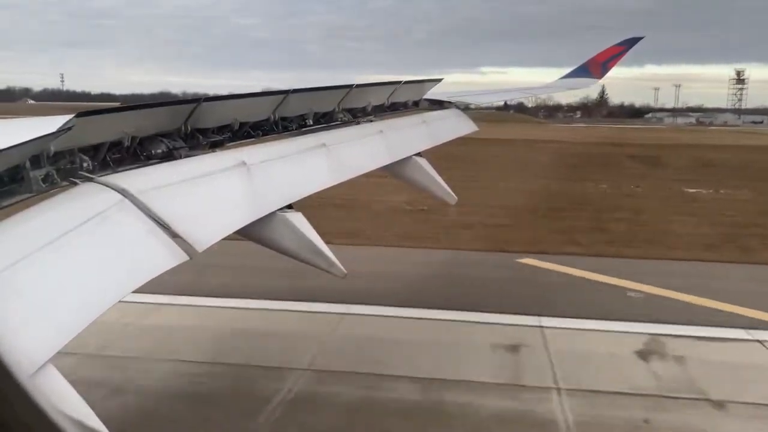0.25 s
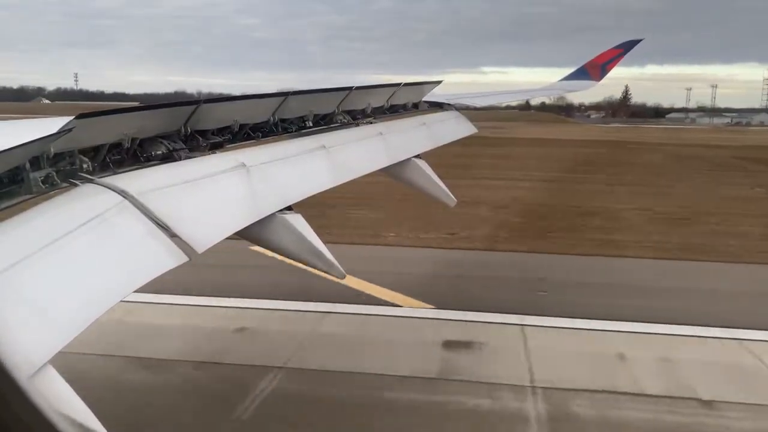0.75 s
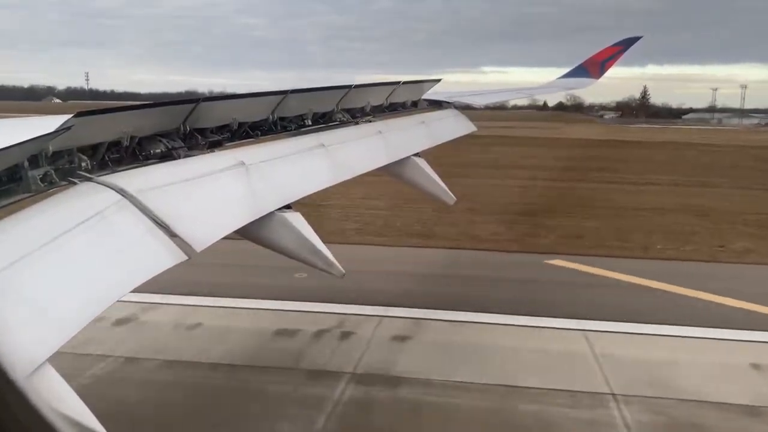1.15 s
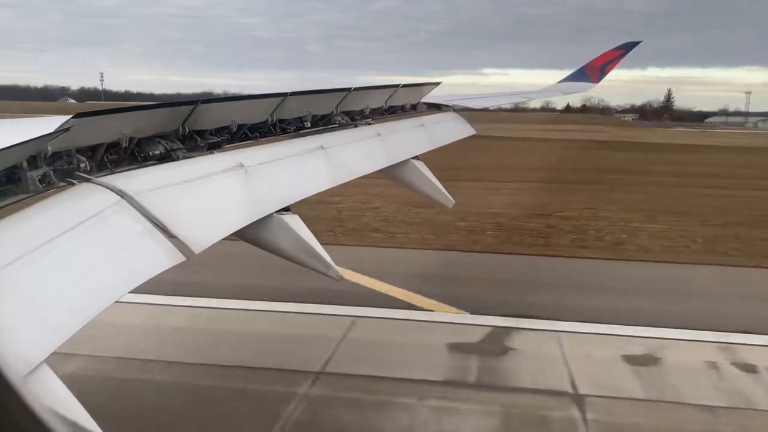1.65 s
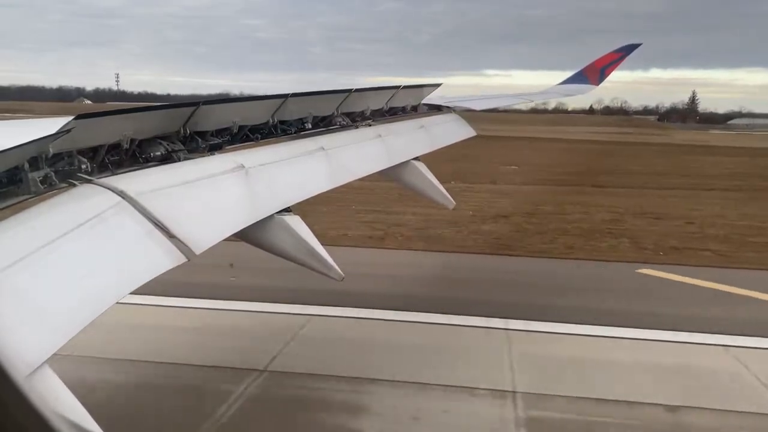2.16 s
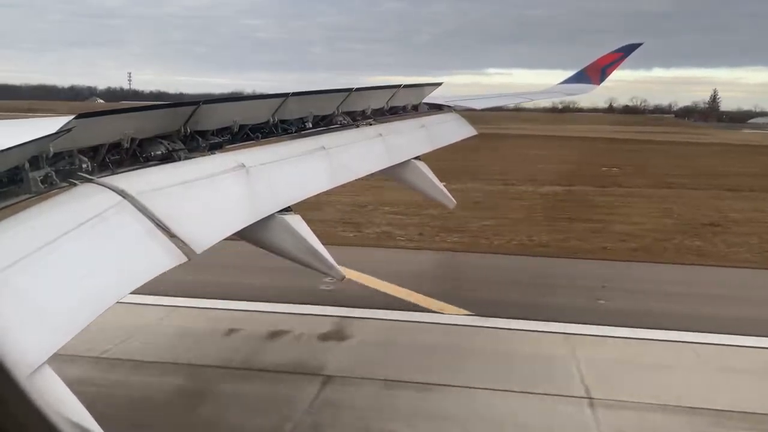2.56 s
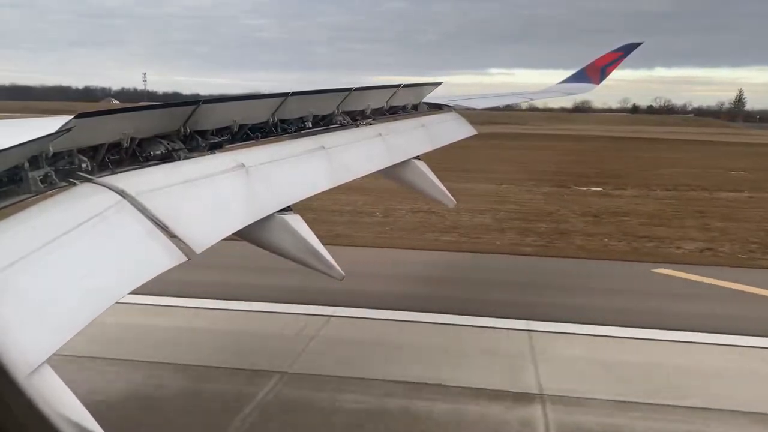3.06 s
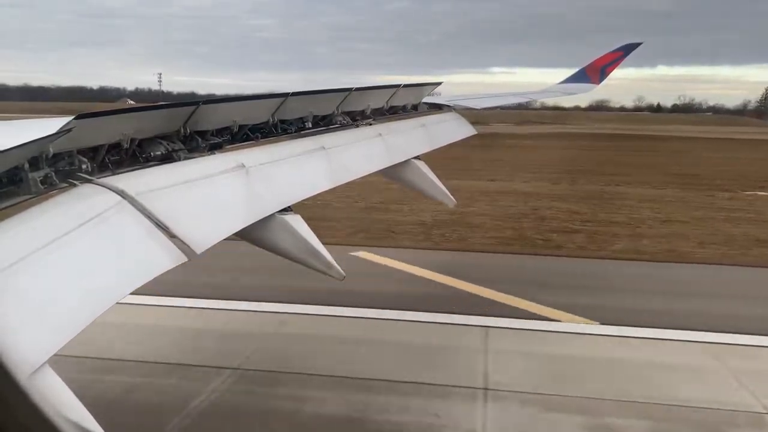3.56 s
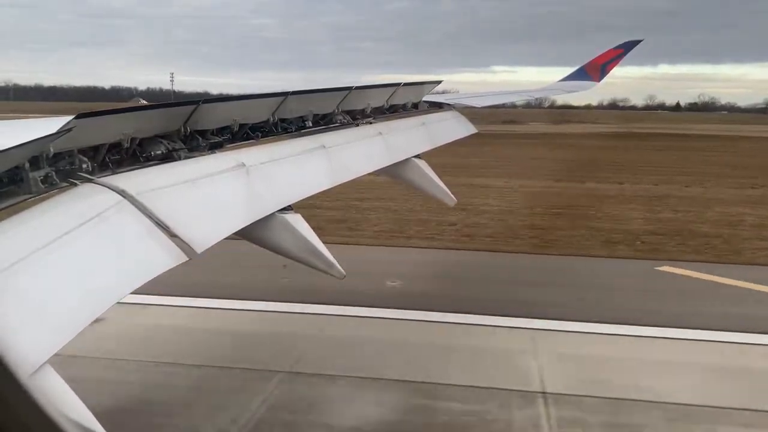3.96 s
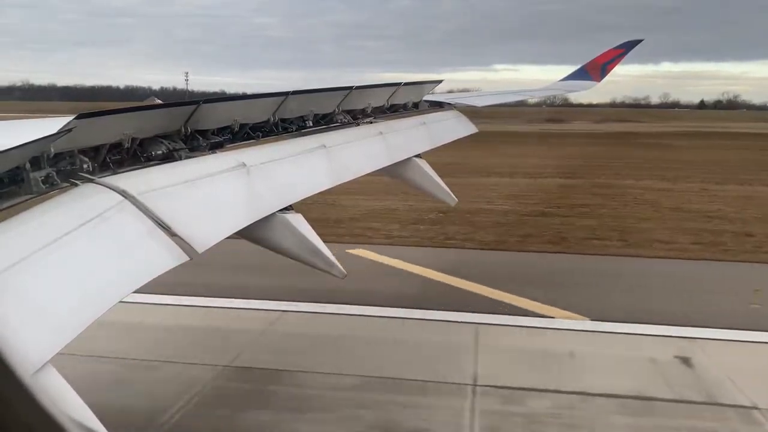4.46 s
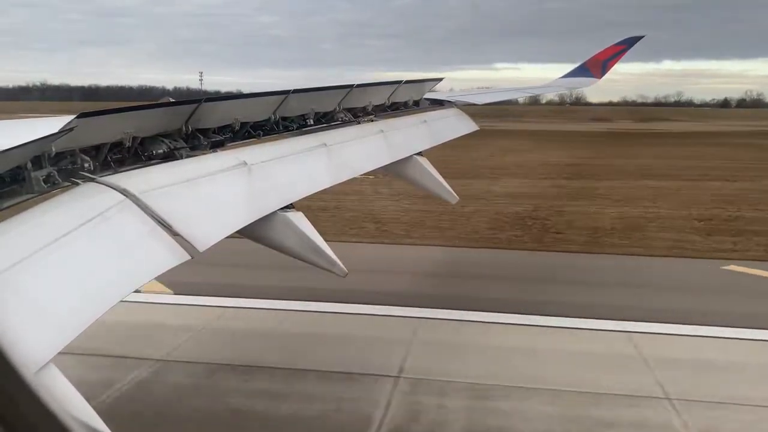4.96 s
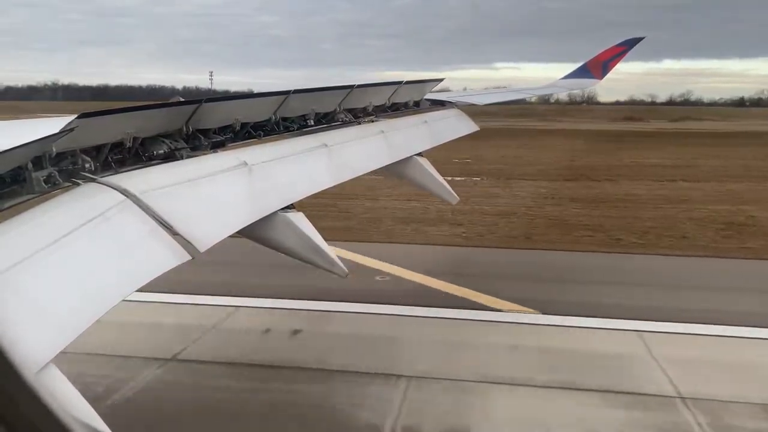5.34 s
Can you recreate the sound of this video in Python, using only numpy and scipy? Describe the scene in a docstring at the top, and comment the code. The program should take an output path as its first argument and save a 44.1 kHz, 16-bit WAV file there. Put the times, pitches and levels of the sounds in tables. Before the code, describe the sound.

Heard from a window seat as an airliner slows on the runway: a loud, dull engine and air roar with booming hull drone fades, dropping clearly near two seconds amid a hard burst of rattling panels. Deep wheel rumble carries on underneath, with loose plastic clacking, ticking and squeaking, a seat fitting knocking, and a thin whine slowly sinking.

```python
"""Window seat of an airliner rolling out along the runway: wheel rumble shakes the floor, hull and cabin boom.
Shaped noise makes rumble, boom and a roar of engines and air, sinking with one drop near 1.7 s.
Wavering sines make the engine drones, which fade too, and a thin whine sinking in pitch with the speed.
Noise through modes makes loose trim chatter, clack and squeak, hardest in one short fit of shaking;
decaying sines make knocks and clinks, rough sines make brief rubs."""
import sys
import numpy as np
from scipy import signal
from scipy.fft import rfft, irfft, next_fast_len
from scipy.io import wavfile
from scipy.ndimage import uniform_filter1d, map_coordinates

SR = 44100
rng = np.random.default_rng(int(sys.argv[2]) if len(sys.argv) > 2 else 0)


def wav_record(signal):
    """Record a signal, one row per channel, as 16-bit PCM in the file named by sys.argv[1]."""
    frames = np.transpose(np.atleast_2d(signal))
    bounded = np.clip(frames, -1, 1)
    # unit amplitude maps onto the largest positive 16-bit level
    quanta = np.round(bounded * 32767).astype(np.int16)
    wavfile.write(sys.argv[1], SR, quanta)


N = 246959

# coherence of left and right: freq_hz, coherence (0 to 1)
COHERENCE = [(50, .99), (150, .97), (230, .78), (310, .94), (390, .9), (620, .15), (950, .68), (1400, .5),
             (1620, .72), (2100, .25), (8500, .4), (11000, .92)]
# phase lead of left over right: freq_hz, lead_rad
LEFT_LEAD = [(50, .08), (220, -.1), (420, .35), (540, 1.3), (720, -.5), (920, 0), (1250, 1.5), (1450, 2.7),
             (1900, 3), (2600, 1.5), (10000, 0)]
# left minus right for airframe sounds: freq_hz, balance_db
AIRFRAME_BALANCE = [(60, -0.5), (140, -2), (250, 0), (450, -5), (620, 1.5), (800, 5), (1100, -5.5),
                    (1800, -0.5), (3000, 1.5), (4500, -11), (10000, 17)]
# left minus right for trim sounds: freq_hz, balance_db
TRIM_BALANCE = [(800, -9), (2000, 0), (3000, -4), (4300, -14), (5500, -10), (7000, -8.5), (8800, -9),
                (11500, 0.5)]
# relative spectrum of the chatter: freq_hz, density_db (per Hz)
CHATTER_SPECTRUM = [(100, -47), (560, -12), (780, 13.5), (1000, 12.5), (1550, 5.5), (2000, 2.5), (3400, 1),
                    (4400, -8), (5300, -6.5), (6100, -14.5), (7600, -15), (8300, -16.5), (9600, -20),
                    (12000, -25), (15000, -41.5)]

HALF = np.array([[.5], [-.5]])  # splits a left-right difference evenly
START_EFFORT_DB = -12
BUMP_EDGE_S = 0.077
REBOUND_S, REBOUND_LOSS_DB = 0.0032, 4  # every clack and knock strikes twice


def amp(db):
    """Decibels to gain."""
    return 10 ** (np.asarray(db) / 20)


def unit(x):
    """Scale to rms 1."""
    return x / np.sqrt(np.mean(x ** 2) + 1e-20)


def along(points, hz):
    """Interpolate (Hz, value) points on a log frequency axis."""
    f, v = np.transpose(points)
    return np.interp(np.log(hz + 1), np.log(f + 1), v)


def wobble(rate_hz):
    """Smooth random curve with rate_hz knots a second."""
    knots = rng.standard_normal(4096)
    return map_coordinates(knots, [np.arange(N) * rate_hz / SR], mode="wrap")


def white():
    """Two unrelated noises."""
    return rng.standard_normal((2, N))


def filtered(x, response):
    """Apply a response given as a function of frequency."""
    m = next_fast_len(N + SR // 2)
    return irfft(rfft(x, m) * response(np.fft.rfftfreq(m, 1 / SR)), m)[..., :N]


def resonance(hz, centre_hz, width_hz):
    """Causal response of one mode."""
    return 1j * hz * width_hz / (centre_hz ** 2 - hz ** 2 + 1j * hz * width_hz)


def add(track, start_s, sound):
    """Mix a sound into a track."""
    part = track[..., max(0, round(start_s * SR)):][..., :sound.shape[-1]]
    part += sound[..., :part.shape[-1]]


def held(start_s, length_s, attack_s, release_s):
    """Exponential attack, hold at 1, exponential release."""
    t = np.arange(N) / SR
    before = np.minimum(t - start_s, 0)
    after = np.maximum(t - start_s - length_s, 0)
    return np.exp(before / attack_s - after / release_s)


def stereo(pair, balance):
    """Unrelated signals become left and right with set coherence, phase lead and level balance."""
    def turn(hz):
        return np.arccos(np.clip(along(COHERENCE, hz), -1, 1)) / 2

    def offset(hz):
        return amp(HALF * along(balance, hz)) * np.exp(1j * HALF * along(LEFT_LEAD, hz))

    mid, side = filtered(pair, lambda hz: np.array([np.cos(turn(hz)), np.sin(turn(hz))]))
    return filtered(np.array([mid + side, mid - side]), offset)


def coloured(pair, spectrum, balance):
    """Shape to a spectrum, offsetting partial cancellation in the mono sum; the sum has rms 1."""
    def summed(hz):
        return np.sqrt(1 + np.clip(along(COHERENCE, hz) * np.cos(along(LEFT_LEAD, hz)), -.8, 1))

    x = stereo(filtered(pair, lambda hz: amp(along(spectrum, hz)) / summed(hz)), balance)
    return x / np.std(x.mean(axis=0))


def even(x, span_s):
    """Level out swells slower than span_s."""
    power = uniform_filter1d(x.mean(axis=0) ** 2, max(8, int(span_s * SR)))
    smooth = uniform_filter1d(np.abs(power), max(8, int(span_s * SR / 2)))
    return x / np.sqrt(smooth + 1e-6)


def effort():
    """Level of engines and rushing air in dB: a steady sag plus one smooth drop."""
    sag_db_per_s = 0.91
    drop_at_s, drop_width_s, drop_db = 1.7, 0.36, 11
    t = np.arange(N) / SR
    return START_EFFORT_DB - sag_db_per_s * t - drop_db / (1 + np.exp((drop_at_s - t) / drop_width_s))


def shaking():
    """Shaking strength of the fittings: a slowly falling tremble plus fits, summed in power."""
    # fits of shaking: start_s, length_s, level_db
    fits = [(0.018, 0.75, -49), (1.158, 0.05, -50), (1.472, 0.089, -47), (1.629, 0.11, -38),
            (1.752, 0.12, -37.5), (1.981, 0.16, -46), (2.228, 0.14, -48), (2.488, 0.085, -46.5),
            (2.698, 0.3, -52.5), (3.038, 0.089, -52.5), (3.509, 0.05, -51), (3.71, 0.16, -50),
            (4.178, 0.49, -51.5), (4.516, 0.24, -47.5), (5.256, 0.15, -50.5), (5.535, 0.094, -46.5)]
    tremble_db, fall_db_per_s = -50, 0.3
    attack_s, release_s = 0.055, 0.048
    tremble = amp(tremble_db - fall_db_per_s * np.arange(N) / SR)
    fit_power = sum((amp(db) * held(s, length, attack_s, release_s)) ** 2 for s, length, db in fits)
    return np.sqrt(tremble ** 2 + fit_power)


def tone(hz):
    """Two sines of rms 1 on one frequency curve, at random phases."""
    return np.sqrt(2) * np.sin(2 * np.pi * np.cumsum(hz) / SR + rng.uniform(0, 2 * np.pi, (2, 1)))


def engine_hum():
    """Engine drones: sines wavering in level and pitch that fade with the effort."""
    # drones: freq_hz, start_level_db, follow (dB per dB of effort)
    drones = [(120, -19.5, 0.9), (360, -35, 0.8), (1256, -44, 1.2), (2563, -61, 0.8)]
    waver_db, waver_hz = 2, 15
    eased_db = effort() - START_EFFORT_DB
    hum = 0
    for hz, level_db, follow in drones:
        gain = amp(level_db + follow * eased_db + waver_db * wobble(14))
        hum = hum + gain * tone(hz + waver_hz * wobble(55))
    return stereo(hum, AIRFRAME_BALANCE)


def whine():
    """Whine sinking in pitch as the aircraft slows: a fluttering jittered sine plus a blurred one."""
    # moments when it sings out: start_s, length_s, extra_db
    swells = [(2.24, 0.23, 1.5), (2.82, 0.076, 1.5), (3.5, 0.17, 0.5), (4.314, 0.039, 7), (4.553, 0.2, 5),
              (4.774, 0.07, 8.5), (4.87, 0.058, 5), (5.3, 0.3, 1.5)]
    start_hz, sag_hz_per_s, level_db = 961.4, 18.6, -50
    jitter, blur, blur_db = 0.007, 0.035, -7  # relative pitch depths; level of the blur
    flutter_depth = 0.45
    hz = start_hz - sag_hz_per_s * np.arange(N) / SR
    swell_db = np.max([db * held(s, length, 0.012, 0.029) for s, length, db in swells], axis=0)

    def wavering(depth):
        return np.array([tone(hz * (1 + depth * wobble(110)))[0] for _ in range(2)])

    flutter = unit(np.abs(1 + flutter_depth * np.tanh(wobble(34))))
    blurred = flutter * wavering(jitter) + amp(blur_db) * wavering(blur)
    return stereo(amp(level_db + swell_db) * blurred, [(900, 2.0)])


def engine_roar():
    """Engines and air roar through the wall: broadband noise following the effort."""
    # relative spectrum: freq_hz, density_db (per Hz)
    roar_spectrum = [(100, -40), (250, -9.5), (480, -8), (650, -3.5), (950, 0.5), (1150, -5), (1400, -11),
                     (1580, -10.5), (2000, -18), (2600, -20), (3300, -20), (4100, -38.5), (6000, -42.5),
                     (15000, -67.5)]
    level_db = -22  # relative to effort
    noise = coloured(white(), roar_spectrum, AIRFRAME_BALANCE)
    return amp(level_db + effort() + 1.0 * wobble(15)) * noise


def cabin_drone():
    """Hollow drone: noise peaking at the cabin resonances."""
    # relative spectrum: freq_hz, density_db (per Hz)
    cabin_spectrum = [(110, -30), (170, -1.5), (200, 2.5), (242, -5), (290, 1), (330, -6), (370, -2.5),
                      (405, -7.5), (470, -14.5), (640, -19), (900, -23), (2000, -120)]
    level_db, follow = -7.5, 0.98  # at 0 dB effort; dB per dB of effort
    noise = even(coloured(white(), cabin_spectrum, AIRFRAME_BALANCE), span_s=0.12)
    return amp(level_db + follow * effort()) * noise


def hull_boom():
    """The hull booms: low noise following the effort."""
    # relative spectrum: freq_hz, density_db (per Hz)
    boom_spectrum = [(70, -30), (100, -2), (124, 3.5), (150, 1), (175, -6.5), (200, -9), (260, -33),
                     (500, -120)]
    level_db = -1  # relative to effort
    noise = even(coloured(white(), boom_spectrum, AIRFRAME_BALANCE), span_s=0.055)
    return amp(level_db + effort() + 0.72 * wobble(13)) * noise


def floor_ring():
    """The roughest stretch sets a floor panel ringing: noise in one narrow mode."""
    start_s, length_s, level_db = 1.72, 0.38, -30
    mode_hz, width_hz = 207, 30
    drone = unit(filtered(rng.standard_normal(N), lambda f: resonance(f, mode_hz, width_hz) ** 2))
    return amp(level_db) * held(start_s, length_s, BUMP_EDGE_S, BUMP_EDGE_S) * drone


def wheel_rumble():
    """Wheels shake the floor: deep noise wandering unevenly in level, varied by the runway surface."""
    # relative spectrum: freq_hz, density_db (per Hz)
    rumble_spectrum = [(12, 16), (30, 5.5), (42, 10.5), (56, 16.5), (78, 19), (100, 16), (125, -1),
                       (160, -30), (250, -59), (600, -120)]
    # rough and smooth stretches of runway: start_s, length_s, extra_db
    stretches = [(0.039, 0.06, 2), (0.47, 0.12, 0), (1.21, 0.27, -0.5), (1.91, 0.25, 4.5), (2.986, 0.11, 2),
                 (3.558, 0.45, -1), (4.216, 0.046, 3), (4.37, 0.055, -2), (4.544, 0.04, 1.5),
                 (5.03, 0.22, 2.5), (5.51, 0.12, 3)]
    level_db, follow = -14, 0.27  # at 0 dB effort; dB per dB of effort
    waver_db, waver_hz = 1, 16
    surface_db = sum(db * held(s, length, BUMP_EDGE_S, BUMP_EDGE_S) for s, length, db in stretches)
    extra_db = surface_db + waver_db * wobble(waver_hz)
    noise = even(coloured(white(), rumble_spectrum, AIRFRAME_BALANCE), span_s=0.085)
    return amp(level_db + follow * effort() + extra_db) * noise


def rubs(gain_db):
    """Fittings rub and sing briefly: sines roughened in pitch and level."""
    # rubs: start_s, length_s, pitch_hz, level_db (before gain)
    rub_events = [(3.91, 0.025, 3850, -57.5), (4.385, 0.015, 5450, -58), (4.69, 0.025, 2250, -53),
                  (4.825, 0.08, 1582, -55), (4.99, 0.07, 1590, -59), (5.42, 0.015, 5500, -59)]
    track = 0
    for start_s, length_s, hz, db in rub_events:
        rough_hz = hz * (1 + 0.03 * wobble(500))
        scrape = np.sin(2 * np.pi * np.cumsum(rough_hz) / SR) * amp(3.0 * wobble(130))
        track = track + amp(db + gain_db) * held(start_s, length_s, 0.004, 0.0073) * scrape
    return track


def squeaks(rise_s, decay_s, grit_db, gain_db):
    """Plastic trim sticks and slips: a short gritty scrape sings in two narrow modes."""
    # squeaks: start_s, low_mode_db, high_mode_db (before gain), low_mode_hz, high_mode_hz
    squeak_events = [(0.3778, -60.5, -60.5, 8700, 11400), (0.524, -66, -65.5, 8740, 11030),
                     (0.6872, -53, -58.5, 8900, 10700), (1.085, -69, -67.5, 9840, 11400),
                     (1.324, -63, -60, 8900, 10900), (1.559, -80, -58, 9000, 11250),
                     (2.228, -50.5, -58.5, 9000, 10500), (2.5318, -58.5, -62, 8800, 10500),
                     (2.6958, -60.5, -66, 8900, 10300), (2.752, -75, -56, 9000, 11000),
                     (2.9517, -59, -66, 9800, 10800), (3.2615, -64, -66, 9800, 10800),
                     (3.492, -76, -67, 9000, 10950), (3.686, -62, -61.5, 9000, 10700),
                     (4.3949, -67, -65, 9300, 10900), (5.4236, -63, -64.5, 9550, 10900)]
    low_width_hz, high_width_hz = 390, 300
    t = np.arange(SR // 8) / SR
    f = np.fft.rfftfreq(len(t), 1 / SR)
    scrapes = np.zeros((2, N))
    slip = (1 - np.exp(-t / rise_s)) * np.exp(-t / decay_s)
    for start_s, low_db, high_db, low_hz, high_hz in squeak_events:
        grit = amp(grit_db * rng.standard_normal(len(t)))
        friction = rfft(slip * rng.standard_normal((2, len(t))) * grit)
        for db, hz, width_hz in ((low_db, low_hz, low_width_hz), (high_db, high_hz, high_width_hz)):
            mode = irfft(friction * resonance(f, hz, 2 * width_hz) ** 2, len(t))
            add(scrapes, start_s - rise_s, amp(db) * unit(mode) * np.std(slip))
    return amp(gain_db) * stereo(scrapes, TRIM_BALANCE)


def knocks(gain_db, left_db, lead_rad, count):
    """As the aircraft brakes, a loose seat fitting knocks and rebounds: decaying sines."""
    # knocks: start_s, level_db (before gain)
    knock_events = [(2.508, -37.5), (2.5442, -36), (2.6838, -32), (2.872, -35), (3.464, -34.5),
                    (3.491, -40), (3.563, -37), (3.685, -32.5), (3.9421, -34), (4.008, -37.5),
                    (4.2467, -31), (4.303, -39), (4.435, -38.5), (4.4934, -35.5), (4.6736, -34.5),
                    (4.745, -34.5), (5.2673, -34.5), (5.331, -31.5), (5.4002, -31.5)]
    # modes of the fitting: freq_hz, level_db, t60_s
    fitting_modes = [(1270, -8.5, 0.025), (1523, 0, 0.03), (1820, -10.5, 0.022), (2220, -14, 0.04)]
    soft_from_s, soft_to_s, soft_db = 1.6, 5.5, -40.5  # fainter random knocks, +-1 dB
    t = np.arange(SR // 12) / SR
    onset = 1 - np.exp(-t / 0.00041)
    track = np.zeros((2, N))
    soft = [(soft_from_s + (soft_to_s - soft_from_s) * u, soft_db + 2 * v - 1.0)
            for u, v in rng.random((count, 2))]
    for start_s, db in list(knock_events) + soft:
        rebound_s = REBOUND_S * rng.uniform(0.7, 1.3)
        for delay_s, loss_db in ((0, 0), (rebound_s, REBOUND_LOSS_DB)):
            ring = 0
            for hz, level_db, t60_s in fitting_modes:
                envelope = amp(level_db + rng.normal(0, 2.2) - 60 * t / t60_s)
                detuned_hz = hz * rng.normal(1, 0.031)
                ring = ring + envelope * np.sin(2 * np.pi * detuned_hz * t + HALF * lead_rad)
            add(track, start_s + delay_s, amp(db - loss_db) * ring * onset)
    return amp(gain_db + HALF * left_db) * track


def clinks(gain_db, spread_db, t60_s, low_hz, high_hz, count):
    """Small parts tap, each at its own pitch, as hard as they are shaken: decaying sines."""
    t = np.arange(SR // 16) / SR
    taps = np.zeros((2, N))
    for when, pitch, size, place in rng.random((count, 4)):
        hz = low_hz * (high_hz / low_hz) ** pitch
        ring = np.sin(2 * np.pi * hz * t) * amp(gain_db - spread_db * size - 60 * t / t60_s)
        pan = [np.cos(np.pi * place), np.sin(np.pi * place)]
        add(taps, when * N / SR, np.outer(pan, ring))
    toned = filtered(taps, lambda hz: amp(along(CHATTER_SPECTRUM, hz) / 2))
    return shaking() * stereo(toned, TRIM_BALANCE)


def clacks(t60_s, high_db, crack_db, strike_db, buzz_db):
    """Loose panels and latches strike, rebound and buzz: ringing modes plus a bright crack."""
    # clacks, levels relative: start_s, level_db, high_mode_share_db, crack_level_db
    clack_events = [(0.2402, -26, -18, -29), (1.186, -37, -24, -14.5), (1.198, -35.5, -25, -18.5),
                    (1.271, -35, -14, -25), (1.452, -32, -17.5, -32.5), (1.465, -34.5, -28, -19),
                    (1.528, -39.5, 1, -32.5), (1.6052, -33, -12, -24), (1.6396, -35.5, 3, -36.5),
                    (1.682, -23, -19, -33.5), (1.702, -34.5, -2.5, -28), (1.7395, -36.5, -6.5, -21),
                    (1.7746, -33, -4.5, -25.5), (1.809, -25.5, -6, -35), (1.8673, -20, -19, -40),
                    (1.922, -45, -16, -25), (1.973, -32, -28, -40), (2.342, -40.5, -12, -25),
                    (2.506, -38, -6, -17.5), (2.5632, -34.5, -10, -32), (2.9323, -39, -12.5, -27),
                    (3.215, -35.5, -20, -31), (3.4981, -31.5, -22, -23), (3.751, -29.5, -14, -26.5),
                    (3.812, -40.5, -12, -24.5), (4.298, -35.5, -16, -29.5), (4.374, -29.5, -17.5, -26),
                    (4.5466, -31.5, -26, -34), (4.6908, -37.5, -21, -24), (4.854, -44.5, -7, -38.5),
                    (5.207, -36.5, -28, -30.5), (5.279, -32, -17, -34.5), (5.3282, -37.5, -21, -17),
                    (5.3998, -34.5, -29, -27.5), (5.528, -40, -17, -26.5)]
    # panel modes, the first three low: freq_hz, width_hz, level_db
    panel_modes = [(945, 270, -8), (1570, 430, 3), (2580, 1200, -4), (3670, 360, -7), (4480, 200, -4),
                   (4980, 510, -10.5), (8460, 1200, -49.5)]
    crack_top_hz = 9500  # upholstery dulls the crack above this
    t = np.arange(SR // 8) / SR
    low, high, cracks = np.zeros((3, 2, N))
    for start_s, db, share_db, bright_db in clack_events:
        envelope = amp(db + buzz_db - 60 * t / t60_s) * (1 - np.exp(-t / 0.00026))
        burst = rng.standard_normal((2, len(t))) * envelope
        add(cracks, start_s, burst * amp(bright_db + crack_db - buzz_db))
        # single-sample strike and rebound excite the modes
        add(burst[0], 0.0006, amp([db + strike_db]))
        add(burst[0], REBOUND_S * rng.uniform(0.3, 1.1), amp([db + strike_db - REBOUND_LOSS_DB]))
        add(low, start_s, burst)
        add(high, start_s, burst * amp(share_db + high_db))

    def modes(rows):
        return lambda f: sum((-1) ** k * amp(db) * resonance(f, hz, width_hz)
                             for k, (hz, width_hz, db) in enumerate(rows))

    ring = filtered(low, modes(panel_modes[:3])) + filtered(high, modes(panel_modes[3:]))
    cushioned = filtered(ring, lambda f: 1 / (1 + (f / 7500) ** 6))
    snap = filtered(cracks, lambda f: resonance(f, 6000, 6000) / (1 + 1j * f / crack_top_hz))
    return amp(5.5) * stereo(cushioned + snap, TRIM_BALANCE)


def chatter(contacts_per_s, spread_db, waver_db, life_s):
    """Loose trim makes tiny dying crackles, with a bright sizzle that rises and falls with the shaking."""
    # small metal parts ringing: freq_hz, width_hz, level_db
    jingle_modes = [(2500, 260, -9), (3700, 130, -8.5), (4420, 100, -3.5), (4960, 170, -7.5),
                    (5600, 59, -15), (8290, 220, 2)]
    # relative spectrum of the sizzle: freq_hz, density_db (per Hz)
    fizz_spectrum = [(3000, -30.5), (6000, -1.5), (9000, -9.5), (15000, -10)]
    fizz_db, fizz_follow = -59, 0.97  # at the strongest shaking; dB per dB of shaking
    shake = shaking()
    strength = amp(spread_db * np.clip(rng.standard_normal(N), -2, 2))
    # contact strength wanders unevenly
    contacts = (rng.random(N) < contacts_per_s / SR) * strength * amp(waver_db * wobble(55))
    energy = signal.lfilter([1], [1, -np.exp(-1 / (life_s * SR))], contacts ** 2)

    def jingle(f):
        return 1 + sum(amp(db) * resonance(f, hz, width_hz) for hz, width_hz, db in jingle_modes)

    crackle = filtered(np.sqrt(energy) * white(), jingle)
    rattle = shake * even(coloured(crackle, CHATTER_SPECTRUM, TRIM_BALANCE), span_s=0.24)
    fizz_gain = amp(fizz_db) * (shake / shake.max()) ** fizz_follow
    return rattle + fizz_gain * coloured(white(), fizz_spectrum, TRIM_BALANCE)


def scene():
    """Everything that reaches the window seat."""
    engines = engine_hum() + whine() + engine_roar()
    airframe = cabin_drone() + hull_boom() + floor_ring() + wheel_rumble()
    seat = rubs(gain_db=2.5) + knocks(gain_db=1.5, left_db=-5.5, lead_rad=2.2, count=36)
    trim = squeaks(rise_s=0.0029, decay_s=0.013, grit_db=5, gain_db=5)
    trim += clinks(gain_db=7, spread_db=12, t60_s=0.011, low_hz=1690, high_hz=6200, count=700)
    trim += clacks(t60_s=0.069, high_db=11.0, crack_db=1.0, strike_db=18, buzz_db=-3.5)
    trim += chatter(contacts_per_s=730, spread_db=1.5, waver_db=0.85, life_s=0.0036)
    return engines + airframe + seat + trim


def record(dry):
    """Round off the highest peaks, then cut everything above the band limit."""
    ceiling, top_hz = .95, 15600
    rounded = dry / (1 + np.abs(dry / ceiling) ** 8) ** (1 / 8)
    return filtered(rounded, lambda hz: hz < top_hz)


dry = scene()
out = record(dry)
wav_record(out)
```